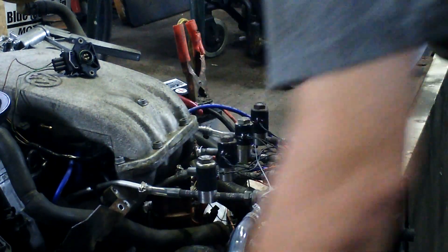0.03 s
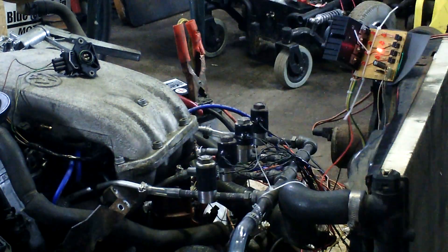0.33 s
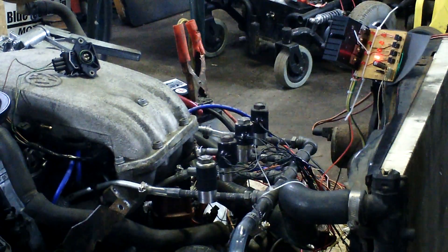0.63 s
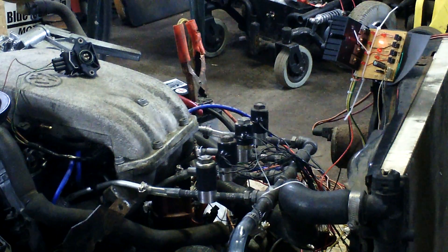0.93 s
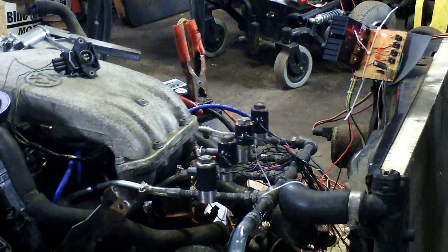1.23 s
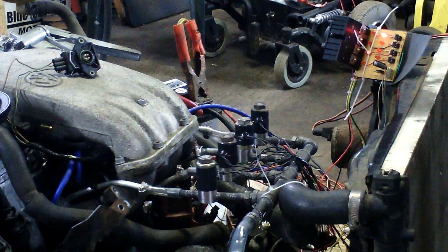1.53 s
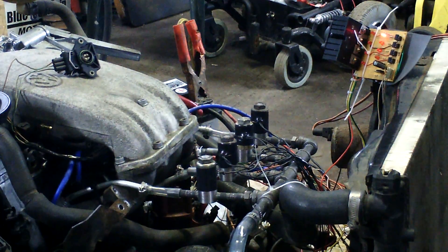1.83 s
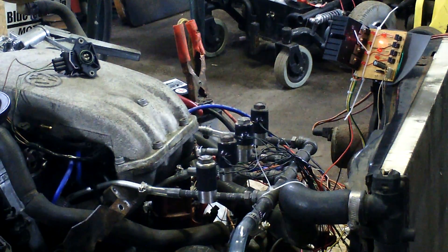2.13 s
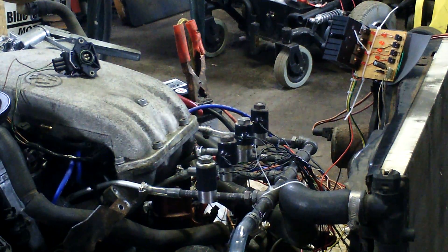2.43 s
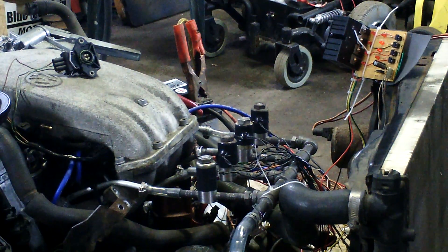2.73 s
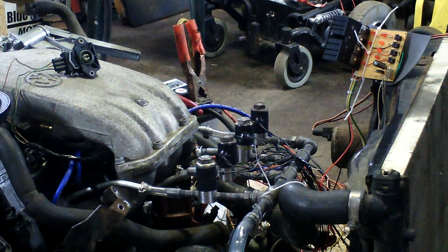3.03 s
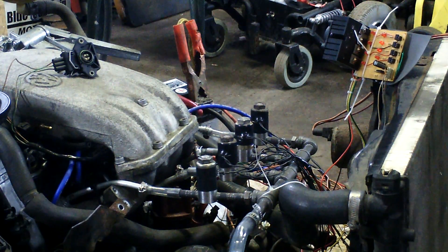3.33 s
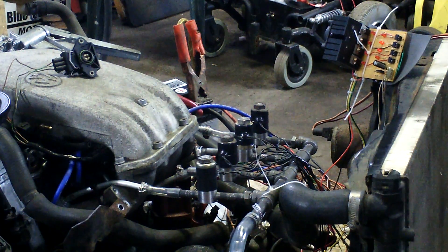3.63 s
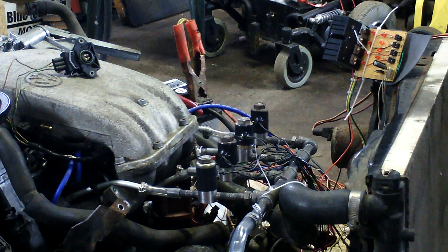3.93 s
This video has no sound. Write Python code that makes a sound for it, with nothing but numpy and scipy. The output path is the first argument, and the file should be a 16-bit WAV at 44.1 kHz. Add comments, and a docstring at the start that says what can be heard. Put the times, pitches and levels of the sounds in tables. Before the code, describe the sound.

Air hisses through a clicking engine that winds down and ends with a metal clank.

```python
"""An engine running on air

A car engine turns over in a workshop, seemingly driven by compressed air through electric valves.
Air rushes, three valves click and spurt in each cycle, and every piston stroke gives a soft thump.
The engine slows and stops, the rush dies to a thin hiss, and a loose metal part clanks and rings."""
import sys
import numpy as np
from scipy import signal
from scipy.fft import rfft, irfft, next_fast_len
from scipy.io import wavfile
from scipy.ndimage import uniform_filter1d, map_coordinates

SR = 44100
rng = np.random.default_rng(int(sys.argv[2]) if len(sys.argv) > 2 else 0)


def generate_wav(sig):
    """Save sig (samples, or channels by samples) to the path in sys.argv[1] as 16-bit PCM at SR."""
    pcm = np.round(np.clip(np.atleast_2d(sig).T, -1, 1) * 32767).astype(np.int16)
    wavfile.write(sys.argv[1], SR, pcm)


N = 176400  # 4 seconds


def amp(db):
    """Turn decibels into a number to multiply by."""
    return 10 ** (np.asarray(db) / 20)


def unit(x):
    """Scale a sound to an average strength (rms) of 1."""
    return x / np.sqrt(np.mean(x ** 2) + 1e-20)


def along(points, hz):
    """Read between (pitch_hz, value) points, with octaves evenly spaced."""
    pitches, values = np.transpose(points)
    return np.interp(np.log(hz + 1), np.log(pitches + 1), values)


def curve(rows):
    """Join (time_s, value) points with straight lines."""
    return np.interp(np.arange(N) / SR, *np.transpose(rows))


def wobble(per_s, size=N):
    """A smooth curve through per_s random points a second."""
    points = rng.standard_normal(int(size * per_s / SR) + 4)
    return map_coordinates(points, [np.arange(size) * per_s / SR])


def filtered(x, response):
    """Turn each pitch in a sound up or down by response(hz)."""
    size = next_fast_len(N + SR // 2)
    return irfft(rfft(x, size) * response(np.fft.rfftfreq(size, 1 / SR)), size)[:N]


def add(track, start_s, sound):
    """Mix a sound into the track at start_s."""
    part = track[max(round(start_s * SR), 0):][:len(sound)]
    part += sound[:len(part)]


def burst(tone, rise_s, fade_s):
    """A puff of noise. Here and below, a fade time is how long a sound takes to drop 60 dB."""
    t = np.arange(SR // 2) / SR
    gains = amp(along(tone, np.fft.rfftfreq(len(t), 1 / SR)))
    noise = irfft(rfft(rng.standard_normal(len(t))) * gains)
    shape = (1 - np.exp(-t / rise_s)) * amp(-60 * t / fade_s)
    return unit(noise * shape) * np.sqrt(np.mean(shape ** 2)) / shape.max()


def flow(tone, patchy_db):
    """Swirling noise whose low and high parts swell and sink separately."""
    bands = signal.stft(rng.standard_normal(N), nperseg=512)[2]
    swells = uniform_filter1d(rng.standard_normal(bands.shape), size=10, axis=0)
    swells = uniform_filter1d(swells, size=14, axis=1)
    noise = signal.istft(bands * amp(patchy_db * unit(swells)), nperseg=512)[1][:N]
    return unit(filtered(noise, lambda hz: amp(along(tone, hz))))


# The tone of each layer of air: pitch_hz, level_db
RUSH_TONE = [(900, -42), (1800, -18.5), (2400, -4), (2750, -2), (3130, -1), (3400, -0.5), (3650, 0),
             (4100, -2), (4550, -6), (5500, -13.5), (9000, -34)]
BODY_TONE = [(60, -38), (250, -21), (450, -6), (670, 0), (850, 0.5), (1000, -1.5), (1250, 2), (1800, -0.5),
             (2130, 1), (2600, -2), (4500, -16), (9000, -38)]
RUMBLE_TONE = [(25, -19), (40, -12), (60, -18), (110, -2), (200, -6.5), (260, 3.5), (330, 3.5), (430, 0),
               (600, 1.5), (1500, -24)]
HISS_TONE = [(2000, -17), (4400, -10), (5400, 0.5), (6200, 2), (7200, 3.5), (9200, -0.5), (11000, 2),
             (12500, -0.5), (13500, -4.5), (15700, -10)]
SIZZLE_TONE = [(9000, -35), (12300, -13.5), (13200, 6), (14200, -3), (15600, -7)]
LEAK_TONE = [(900, -24), (1130, -9), (1400, -11.5), (2100, 7), (2600, -2), (3650, 3.5), (4500, -5),
             (4950, 0), (5280, 4.5), (5750, -1.5), (7000, -3), (8700, -3), (9700, -12), (11400, -2.5),
             (12200, -12), (13400, -19), (14400, -17), (15700, -19)]
PIPE_TONE = [(350, -43), (525, -20.5), (572, -7), (615, -15.5), (800, -47)]
# How each layer swells and sinks: time_s, level_db
RUSH_LEVEL = [(0, -25), (.13, -27), (.22, -26), (.36, -26.5), (.5, -27.5), (.64, -25), (.8, -26.5),
              (.94, -25.5), (1.05, -27), (1.17, -26), (1.31, -27), (1.39, -28), (1.46, -25.5), (1.53, -27),
              (1.59, -24), (1.64, -28), (1.72, -26), (1.98, -25), (2.04, -29.5), (2.13, -25), (2.22, -29),
              (2.3, -26.5), (2.47, -30.5), (2.6, -35.5), (2.79, -35), (2.96, -48)]
BODY_LEVEL = [(0, -33.5), (.3, -32.5), (.85, -33.5), (1.13, -32.5), (1.25, -35), (1.55, -33.5),
              (1.65, -37.5), (1.85, -32.5), (2.1, -36), (2.22, -37.5), (2.6, -39.5), (2.75, -38.5),
              (2.96, -44.5)]
RUMBLE_LEVEL = [(0, -46), (.5, -43), (1.1, -46), (1.7, -47.5), (1.9, -51), (2.2, -50), (2.6, -56),
                (3.0, -59), (3.4, -71)]
HISS_LEVEL = [(0, -33), (.45, -32.5), (.53, -35.5), (.62, -32.5), (1.5, -31.5), (2.0, -32.5), (2.22, -34.5),
              (2.32, -34), (2.6, -38.5), (2.67, -34), (2.95, -41), (3.2, -50), (3.45, -64), (4, -80)]
SIZZLE_LEVEL = [(0, -55), (.95, -59), (1.07, -43), (1.33, -42), (1.5, -44), (1.75, -51), (1.95, -44),
                (2.2, -53.5), (2.32, -48), (2.55, -55), (2.8, -58), (3.0, -62.5), (3.5, -85)]
LEAK_LEVEL = [(0, -44), (2.6, -40.5), (3.0, -37), (3.25, -43), (3.45, -53), (3.58, -55), (3.7, -66),
              (4, -72)]
PIPE_LEVEL = [(0, -67), (.2, -50), (.45, -46), (.6, -50), (1.7, -51), (2.15, -48), (2.33, -44), (2.52, -52),
              (2.66, -40), (2.82, -59), (2.95, -47), (3.25, -63), (4, -70)]
def air(stop_s=3, rush_fade_db_per_s=35, body_fade_db_per_s=30):
    """Air rushes through the engine and hums in a pipe; as the pressure falls, a thin leak is left."""
    stopped_s = np.maximum(np.arange(N) / SR - stop_s, 0)
    sag_db = pressure_sag()
    rush_db = curve(RUSH_LEVEL) - 1.0 - sag_db - rush_fade_db_per_s * stopped_s
    body_db = curve(BODY_LEVEL) - sag_db / 2 - body_fade_db_per_s * stopped_s
    rush = amp(rush_db + 0.44 * wobble(54.98)) * flow(RUSH_TONE, patchy_db=0.85)
    body = amp(body_db + 0.76 * wobble(60)) * flow(BODY_TONE, patchy_db=0.96)
    rumble = amp(curve(RUMBLE_LEVEL) + 0.82 * wobble(29.86)) * flow(RUMBLE_TONE, patchy_db=1.3)
    hiss = amp(curve(HISS_LEVEL) + 0.81 * wobble(25.65)) * flow(HISS_TONE, patchy_db=2.0)
    sizzle = amp(curve(SIZZLE_LEVEL) + 2.2 * wobble(21.9)) * flow(SIZZLE_TONE, patchy_db=5.0)
    leak = amp(curve(LEAK_LEVEL)) * flow(LEAK_TONE, patchy_db=-0.5)
    pipe = amp(curve(PIPE_LEVEL) + wobble(13)) * flow(PIPE_TONE, patchy_db=-0.3)
    return passages(scatter(rush + body + rumble + hiss + sizzle + leak + whistles()) + pipe)


def scatter(x, share=0.28, fade_s=0.19):
    """Sound bounces among the engine parts, making many tiny echoes."""
    t = np.arange(SR // 10) / SR
    echoes = rng.standard_normal(len(t)) * amp(-60 * t / fade_s)
    bounced = signal.fftconvolve(x, echoes / np.linalg.norm(echoes))[:N]
    return (x + share * bounced) / np.hypot(1, share)


# Where the air passages change the tone: pitch_hz, width_hz, boost_db
PASSAGES = [(546, 26, 3.5), (663, 13, 5), (878, 28, 3), (1266, 31, 1.5), (1470, 27, 2.5), (2135, 26, 1),
            (2350, 37, 3.5), (2460, 42, 0.5), (2820, 50, 0.5), (3000, 45, 3), (3130, 90, 4), (3700, 48, 5),
            (3850, 38, 0), (4660, 120, -7)]
def passages(x):
    """The hollow passages ring at some pitches and soften another."""
    def response(hz):
        return amp(sum(db / (1 + (2 * (hz - pitch) / width) ** 2) for pitch, width, db in PASSAGES))
    return filtered(x, response)


# The background's tone: pitch_hz, level_db
WORKSHOP_TONE = [(25, -40.5), (60, -33), (120, -21), (185, -13.5), (260, -16.5), (370, -6), (505, -7),
                 (830, -2), (1130, -3.5), (1500, -9), (2200, -8), (2760, -11.5), (3070, -7.5), (3490, -16),
                 (5000, -26), (9000, -27.5), (14500, -39), (15600, -28)]
# Its loudness: time_s, level_db
WORKSHOP_LEVEL = [(0, -56.5), (3.4, -44), (3.75, -45), (4, -47)]
def workshop():
    """Soft background noise fills the workshop and slowly swells."""
    return amp(curve(WORKSHOP_LEVEL)) * flow(WORKSHOP_TONE, patchy_db=0.3)


# Each time a valve opens: start_s, level_db, valve_name
CLICKS = [(0.055, -21.5, "a"), (0.0977, -21.5, "b"), (0.151, -27, "c"), (0.273, -21.5, "a"),
          (0.311, -19.5, "b"), (0.3644, -22, "c"), (0.48, -21, "a"), (0.5251, -17.5, "b"),
          (0.5795, -21, "c"), (0.7025, -22, "a"), (0.749, -19, "b"), (0.8056, -21.5, "c"),
          (.9537, -22, "a"), (0.9834, -19.5, "b"), (1.0426, -23, "c"), (1.187, -21.5, "a"),
          (1.2432, -19.5, "b"), (1.3115, -20, "c"), (1.4707, -22.5, "a"), (1.5335, -19.5, "b"),
          (1.6034, -20.5, "c"), (1.772, -20.5, "a"), (1.839, -19, "b"), (1.916, -21.5, "c"),
          (2.1011, -22, "a"), (2.1786, -19, "b"), (2.2754, -20.3, "c"), (2.6722, -21, "a")]
# Each valve's tone: pitch_hz, level_db
VALVE_TONES = {"a": [(150, -43), (1000, -8), (3400, -15), (5200, -14), (6700, 4.5), (9800, -11), (11200, 9),
               (12100, 8.5), (12900, -12), (15500, -14)], "b": [(150, -45), (1000, -14), (2700, 8),
               (5500, -24), (7300, -3.5), (9200, 9), (11200, 7), (12600, -6), (15500, -14)],
               "c": [(150, -40), (700, -30), (3700, 4), (5000, -6), (6300, 3), (8500, -3), (12000, 0),
               (13500, -3.5), (15500, -4)]}
# The stroke each valve starts: thump_db, spurt_db, sag_db
STROKES = {"a": (-59.5, -55, 0.57), "b": (-50, -36.5, 3), "c": (-49, -39, 0.84)}
def valves(snap_rise_s=0.00018, bounce_s=0.016, echo_db=-17):
    """Each valve's plunger snaps, bounces and lands again, letting a spurt of air through."""
    snaps, spurts = np.zeros(N), np.zeros(N)
    for start_s, db, valve in CLICKS:
        tone = VALVE_TONES[valve]
        _, spurt_db, _ = STROKES[valve]
        add(snaps, start_s, amp(db + 6) * burst(tone, snap_rise_s, fade_s=0.0068))
        add(snaps, start_s + bounce_s, amp(db - 22) * burst(tone, snap_rise_s, fade_s=0.027))
        add(spurts, start_s, amp(spurt_db) * burst(tone, rise_s=0.018, fade_s=0.23))
    return snaps + spurts + amp(echo_db) * room(snaps)


def pressure_sag(deepest_s=0.018):
    """How many dB the rush of air sinks after each valve opens, before it recovers."""
    sag = np.zeros(N)
    age = np.arange(SR // 2) / SR / deepest_s
    for start_s, _, valve in CLICKS:
        _, _, sag_db = STROKES[valve]
        add(sag, start_s, sag_db * age * np.exp(1 - age))
    return sag


# The low notes in a thump: pitch_hz, level_db
THUMP_NOTES = [(114, -4.5), (157, -2.5), (72, -23), (282, -8)]
# How hard the pistons push: time_s, boost_db
THUMP_FORCE = [(0, 6), (1.0, -1.5), (2.3, 1), (2.7, -22)]
def pistons(delay_s=0.004, rise_s=0.014, fade_s=0.19, fourth_db=-50.5):
    """A piston thumps after each click; the fourth piston thumps between cycles, with no click."""
    strokes = [(start_s, STROKES[valve][0]) for start_s, _, valve in CLICKS]
    for (start_s, _, valve), (next_s, _, _) in zip(CLICKS, CLICKS[1:]):
        if valve == "c":
            strokes.append(((start_s + next_s) / 2, fourth_db))
    out, t = np.zeros(N), np.arange(SR // 2) / SR
    shape = (1 - np.exp(-t / rise_s)) * amp(-60 * t / fade_s)
    for start_s, db in strokes:
        ring = sum(amp(note_db + rng.normal(0, 1.2)) * np.sin(2 * np.pi * hz * t)
                   for hz, note_db in THUMP_NOTES)
        add(out, start_s + delay_s, amp(db) * ring * shape / shape.max())
    return out * amp(curve(THUMP_FORCE))


# How long the room rings: pitch_hz, fade_s
ROOM_FADES = [(200, 1), (2000, 0.55), (10000, 0.46)]
def room(x):
    """The workshop's echo, in which high sounds die sooner than low ones."""
    hz, t, bands = signal.stft(rng.standard_normal(SR), SR, nperseg=256)
    fade = amp(-60 * t / along(ROOM_FADES, hz)[:, None])
    tail = signal.istft(bands * fade, SR, nperseg=256)[1]
    echo = np.pad(tail, (SR // 100, 0)) / np.linalg.norm(tail)  # arrives 10 ms late
    return signal.fftconvolve(x, echo)[:N]


# Whistles and, last, the workshop whine: loudest_at_s, half_length_s, pitch_hz, half_width_hz, level_db
WHISTLES = [(2.47, .1, 12950, 220, -51.5), (2.78, .15, 14350, 300, -52), (3.14, 0.35, 5180, 185, -53),
            (3.347, 0.16, 11300, 450, -54.5), (2.462, 0.079, 3100, 70, -37), (3.8, 0.3, 3060, 70, -57)]
def whistles():
    """Thin whistles swell and overlap as the air dies away; a faint workshop whine is left at the end."""
    out, t = np.zeros(N), np.arange(N) / SR
    for loudest_at_s, half_length_s, pitch, half_width, db in WHISTLES:
        tone = filtered(rng.standard_normal(N), lambda hz: 1 / (1 + ((hz - pitch) / half_width) ** 2))
        swell = np.exp(-((t - loudest_at_s) / half_length_s) ** 2)
        out += amp(db) * unit(tone) * swell
    return out


# Knocks of the loose part: start_s, level_db
KNOCKS = [(2.996, -21.5), (3.017, -30), (3.027, -27.5), (3.047, -27.5), (3.066, -31), (3.085, -36),
          (3.11, -40)]
# The notes it rings with: pitch_hz, level_db, fade_s
METAL_NOTES = [(1172, -4.5, 0.27), (1234, -11, 0.12), (1450, -15, 0.13), (1513, -7, .19), (1510, -4, 0.23),
               (1976, -14, .2), (2050, -6.5, 0.13), (2113, -0.5, 0.17), (2230, -8, 0.19),
               (2220, -5.5, 0.26), (2600, -15.5, .12), (3300, -11, .12), (3480, -13, .12)]
# The sharp crack of each hit: pitch_hz, level_db
CRACK_TONE = [(80, -50), (400, -15), (900, -15), (1200, -6.5), (1500, -1), (1800, -15), (2150, -5),
              (2700, -11), (3650, -10.5), (4300, -25), (9000, -45)]
def clank(ring_db=-4.5, ring_rise_s=0.00063, crack_db=2, rattle_radians=0.33):
    """A loose metal part is knocked and rings; it shifts on its seat, which roughens the ring."""
    out, t = np.zeros(N), np.arange(SR // 2) / SR
    for start_s, db in KNOCKS:
        ring = np.zeros(len(t))
        for hz, note_db, fade_s in METAL_NOTES:
            loudness = amp(note_db + rng.normal(0, 1.6) - 60 * t / fade_s)
            phase = 2 * np.pi * rng.random() + rattle_radians * wobble(per_s=89, size=len(t))
            ring += loudness * np.sin(2 * np.pi * hz * t + phase)
        add(out, start_s, amp(db + ring_db) * ring * (1 - np.exp(-t / ring_rise_s)))
        add(out, start_s, amp(db + crack_db) * burst(CRACK_TONE, rise_s=0.00051, fade_s=0.045))
    return out


# The last faint ticks: start_s, level_db, fade_s
TICKS = [(3.4964, -37, 0.013), (3.575, -44, 0.23), (3.6916, -53, .015)]
# Their tone: pitch_hz, level_db
TICK_TONE = [(150, -40), (800, -2), (2800, 8), (5800, -8), (8000, -15), (15000, -31.5)]
def ticks():
    """The engine ticks as it settles."""
    out = np.zeros(N)
    for start_s, db, fade_s in TICKS:
        add(out, start_s, amp(db) * burst(TICK_TONE, rise_s=0.00065, fade_s=fade_s))
    return out


def metal(bass_cut_hz=650, echo_db=-6.5):
    """Small metal parts give off little bass; their clank and ticks echo in the room."""
    hits = filtered(clank() + ticks(), lambda hz: (1j * hz / (bass_cut_hz + 1j * hz)) ** 2)
    return hits + amp(echo_db) * room(hits)


def scene():
    """Add up all the sounds, the same on the left and right."""
    mono = valves() + pistons() + air() + metal() + workshop()
    return np.array([mono, mono])


def record(dry, dip_hz=7865, half_width_hz=224, dip_db=-16, top_hz=15950):
    """The microphone softens one narrow band of high pitches and misses the very highest."""
    def response(hz):
        return amp(dip_db / (1 + ((hz - dip_hz) / half_width_hz) ** 2)) * (hz < top_hz)
    return np.array([filtered(channel, response) for channel in dry])


dry = scene()
out = record(dry)
generate_wav(out)
```